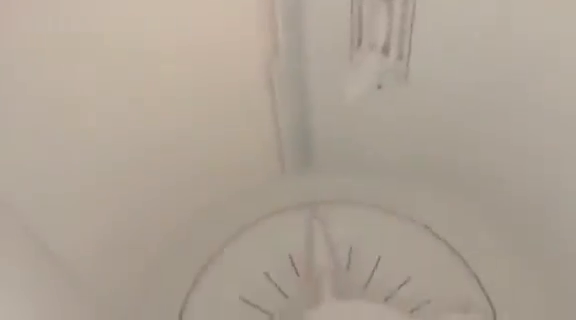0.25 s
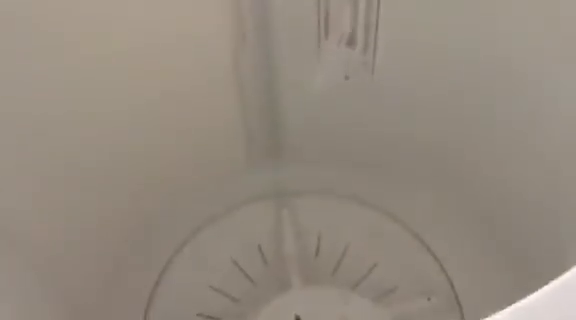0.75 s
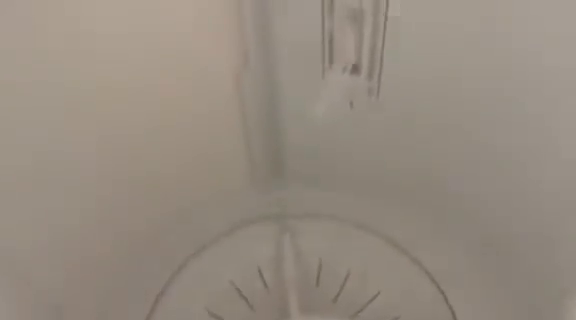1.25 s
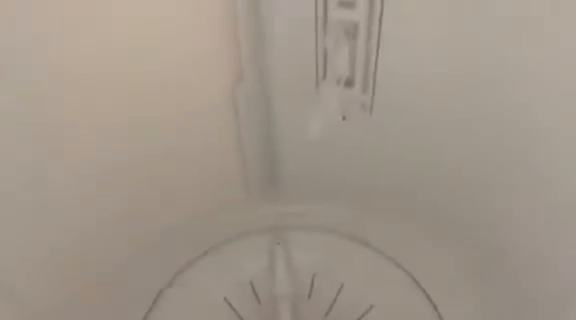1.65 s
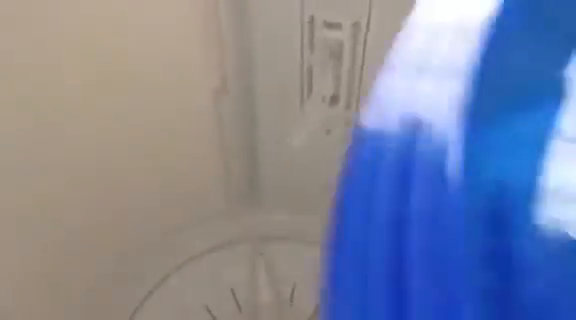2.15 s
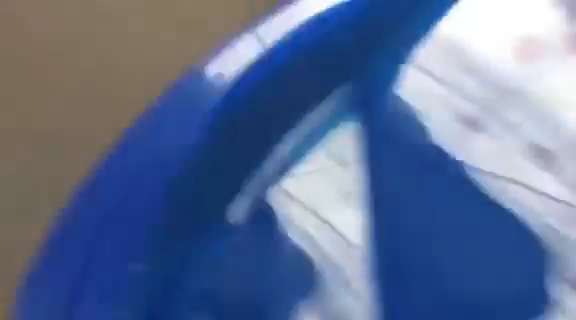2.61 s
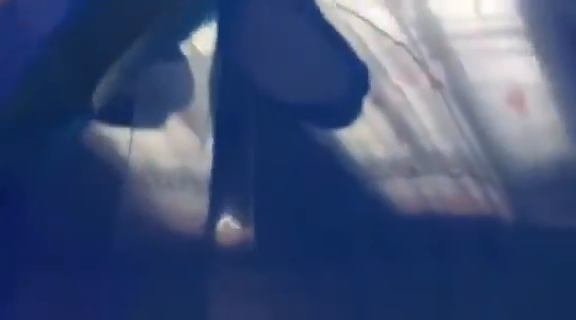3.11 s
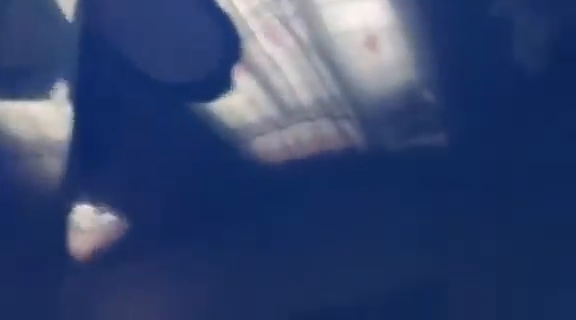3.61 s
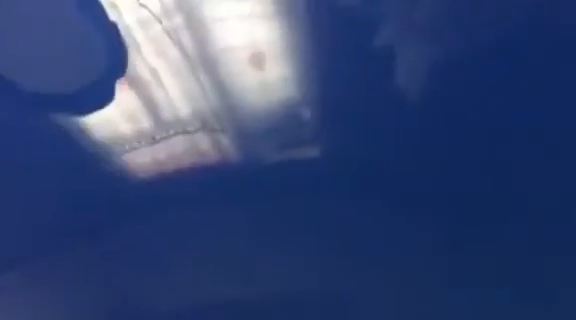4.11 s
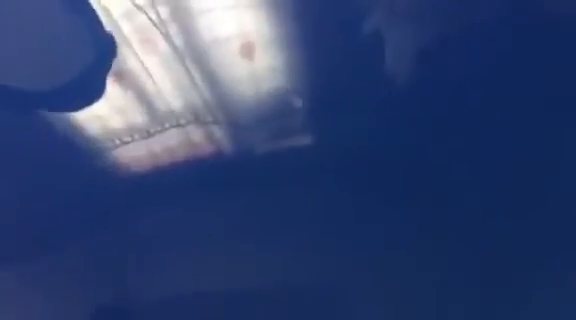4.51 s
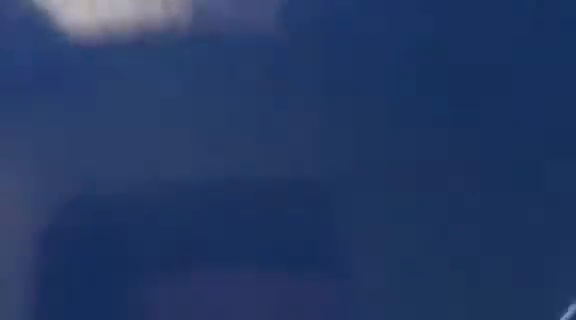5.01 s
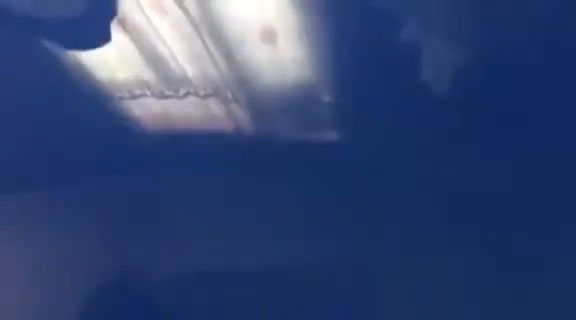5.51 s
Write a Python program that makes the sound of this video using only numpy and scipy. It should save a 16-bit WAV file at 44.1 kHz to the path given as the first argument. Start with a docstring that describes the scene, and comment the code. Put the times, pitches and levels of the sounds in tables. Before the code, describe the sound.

Over a faint indoor hum, a rooster crows far outside and a small bird repeats a thin rising whistle. Close to the microphone, a plastic lid clatters against a washing machine tub with hollow, booming knocks. It then scrapes along the rim, catching and slipping in low groans between lighter taps, until one heavy thump and a short scrape put it in place. The small room adds a brief echo.

```python
"""Hollow knocks and a low juddering scrape, close up: a plastic lid is dragged over the tub of a
washing machine and knocked into place. Each hit clacks and sets the tub booming; the sliding lid
catches, sticks and slips on the rim, and a small hard room answers. Behind it sit a faint hum,
room air and, far outside, crowing roosters and a bird's rising whistle."""
import sys
import numpy as np
from scipy import signal
from scipy.fft import rfft, irfft, next_fast_len
from scipy.io import wavfile
from scipy.ndimage import uniform_filter1d

SR = 44100
rng = np.random.default_rng(int(sys.argv[2]) if len(sys.argv) > 2 else 0)


def file_out(sig):
    """Save sig as 16-bit WAV at sys.argv[1]."""
    # one column per channel
    cols = np.atleast_2d(sig).T
    # limit, then scale
    lim = np.clip(cols, -1, 1)
    pcm = np.round(lim * 32767).astype(np.int16)
    wavfile.write(sys.argv[1], SR, pcm)


N = 253575
TIME = np.arange(N) / SR

# lid hits on the tub: start_s, clack_db, hardness_db_per_octave, thud_db, boom_db, ping_hz
KNOCKS = [(1.26, -49, 3.5, -42, -41, 1760), (2.139, -33.5, 0.8, -29, -48, 1305),
          (2.146, -37, 0.5, -38.5, -34.5, 2170), (2.353, -32, -1.2, -17.5, -18.5, 1736),
          (2.442, -35.5, -1.9, -28, -24, 2470), (2.449, -42.5, 5.8, -29.5, -28, 1220),
          (2.524, -49, -1.5, -34.5, -46, 1000), (2.562, -38.5, -1.5, -25, -56, 1070),
          (2.573, -35.5, -2.5, -24, -23.5, 1210), (2.667, -54.5, -2, -45.5, -52, 713),
          (3.062, -67, .5, -46, -69, 790), (3.126, -60, .5, -53, -66, 1080),
          (3.331, -64, 1.5, -42.5, -39.5, 604), (3.83, -60.5, 0, -37.5, -45, 630),
          (3.875, -44.5, 4.5, -35.5, -41, 1110), (3.91, -53, 0.5, -52, -41, 1170),
          (4.115, -40.5, 0.5, -31, -33.5, 1280), (4.161, -52, -.5, -47, -39, 1080),
          (4.177, -45, -2, -36, -54, 1070), (4.189, -44, -4, -28, -37, 626), (4.56, -53, -1, -30, -30, 940),
          (4.597, -47.5, -2.5, -29, -36.5, 665), (4.625, -56, 2, -62, -42.5, 844),
          (4.865, -34.5, -0.2, -27, -36.5, 1140), (5.166, -24, -5, -19.5, -13.5, 760),
          (5.167, -27, -1.5, -29.5, -30.5, 1413), (5.379, -57.5, -12, -60, -49, 610),
          (5.414, -52, -3, -47, -55, 686), (5.505, -33.5, 0.7, -28, -29.5, 1120),
          (5.537, -50.5, 3.5, -46, -48, 4500), (5.602, -53, 3.1, -50, -39.5, 660)]
# a knock's six bands (boom, wall thud, rim, clack, snap, crack): edge_hz
BAND_EDGES = [45, 90, 450, 1000, 2800, 5200, 10500]
# tub ring over plastic chatter, per band: balance_db
RING_BALANCE = [10, 6.5, 3, -2.5, -10, -30.5]
# swell of each band: attack_s
BAND_ATTACKS = [.005, 0.00034, .0003, .0002, 0.0005, 0.0013]
# top four bands of an average knock, relative to its clack: level_db
CLACK_SHAPE = [-2, -1.5, -7.5, -19.5]
# modes of the tub with its lid: pitch_hz, level_db, t60_s
TUB_MODES = [(63.3, 5.5, 0.3), (70.1, 10.5, 0.14), (111.8, -5, 0.19), (120.6, -2, 0.28),
             (147.4, -0.5, 0.18), (184, -1.5, 0.09), (219.9, -3, 0.17), (262.4, 1, 0.077),
             (312, -9.5, 0.23), (344.8, -6.5, 0.17), (401.7, -9.5, 0.2), (561, -2.5, 0.17), (708, -2, 0.16),
             (772, -3, 0.15), (856, -9, 0.39), (1019, -7, 0.35), (1120, -13.5, 0.17), (1236, -4.5, 0.51),
             (1334, -7, 0.17), (1447, -4.5, 0.14), (1550, -6.5, 0.18), (1774, -1.5, 0.096),
             (1905, -12, 0.32), (2146, -9.5, 0.35), (2337, -11.5, 0.45), (3670, -12.5, 0.039),
             (3960, -7.5, 0.021), (4520, -25, 0.083), (4800, -24.5, 0.2)]
# tone of the plastic's dense small modes: frequency_hz, gain_db
PLASTIC_EQ = [(35, -22), (60, -5.5), (155, -3.5), (284, -10), (420, -19), (593, -15.5), (720, -14),
              (875, -30.5), (1180, -23.5), (1670, -26.5), (2220, -25.5), (2810, -34), (8640, -47.5),
              (10500, -53), (13600, -95), (22000, -120)]
# pushes on the sliding lid: peak_s, rise_s, fall_s, rumble_db, scrape_db
PUSHES = [(2.71, 0.12, 0.37, -35.5, -64), (2.97, 0.6, 0.4, -39.5, -63), (3.37, 0.29, 0.36, -38.5, -68.5),
          (3.82, 0.38, 0.24, -34.5, -66.5), (4.099, 0.09, 0.047, -32.5, -56.5),
          (4.449, 0.063, 0.21, -39, -69.5), (4.68, 0.24, 0.14, -48, -62.5),
          (4.841, 0.045, 0.061, -36.5, -59.5), (5.06, .3, 0.43, -40.5, -66.5),
          (5.251, 0.1, 0.09, -22.5, -55), (5.4, 0.046, .04, -30.5, -71), (5.445, 0.058, 0.17, -27, -51),
          (5.536, 0.033, 0.054, -26, -56), (5.628, 0.091, 0.044, -36.5, -78)]
# body of the tub under the slide: frequency_hz, gain_db
RUMBLE_EQ = [(15, -63), (25, -40.5), (56, -0.5), (113, 7), (151, -1.5), (211, -4.5), (290, -10.5),
             (390, -18), (496, -33.5), (541, -36), (634, -19.5), (723, -42), (800, -26), (1040, -59),
             (1760, -120)]
# grit of the lid on the rim: frequency_hz, gain_db
SCRAPE_EQ = [(240, -35), (400, -4), (637, -9.5), (720, -15), (884, -18), (1040, -4.5), (1180, -11.5),
             (1510, -11), (2530, -19), (10500, -33), (13600, -67.5), (22000, -120)]
# stick-slip bursts: peak_s, rise_s, fall_s, slip_rate_hz, level_db
JUDDERS = [(1.319, .05, .17, 109, -40.5), (2.471, .07, 0.091, 109, -23), (2.59, 0.028, 0.1, 127, -19),
           (3.05, 0.19, 0.4, 123, -46), (3.87, .13, 0.048, 105.4, -22), (3.93, .04, 0.036, 94, -26),
           (4.088, 0.029, 0.099, 91.6, -25.5), (4.21, .03, 0.053, 105, -26), (5.05, 0.084, 0.13, 90, -36),
           (5.47, .04, 0.088, 192, -27.5)]
# syllables, one list a rooster: start_s, length_s, pitch_hz, sag_share, level_db, jitter_share
CROWS = [
    [(0, 0.24, 900, 0.052, -58.5, 0.031), (.245, .17, 1002, 0.041, -57, .04),
     (.44, .36, 987.5, .07, -55.5, 0.037), (.84, .44, 927, .1, -57, .013)],
    [(4.39, 0.29, 474, 0.0174, -63.5, .02), (4.6, 0.16, 512.6, 0.018, -61.5, 0.018),
     (4.8, 0.54, 515, 0.043, -60, 0.041)],
    [(1, .33, 1000, 0.032, -75.5, 0.016), (1.5, 0.25, 1050, .07, -74, 0.042)],
]
# voices, one list a rooster: harmonic_number, level_db
CROW_HARMONICS = [
    [(1, 0.5), (2, 13), (3, -21), (4, -25)],
    [(2, 4.5), (3, -17), (4, 9), (5, -10), (7, -5)],
    [(1, 0)],
]
# the bird's whistles: start_s, level_db
WHISTLES = [(0.199, -70.5), (0.971, -73.5), (1.951, -71), (3.34, -73), (4.078, -73), (4.938, -75.5)]
# tones of the hum: pitch_hz, level_db
HUM_TONES = [(107.7, -63.5), (145.3, -64.5), (263.8, -66.5)]
# tone of the still air: frequency_hz, gain_db
AIR_EQ = [(21, -46.5), (35, -12), (81, 0.5), (177, -6), (266, 0), (439, -19), (725, -22.5), (837, -25),
          (943, -25), (1480, -29.5), (1710, -29), (2020, -30), (5010, -37.5), (9320, -44.5), (10500, -47.5),
          (13600, -83.5), (22000, -120)]
# decay of the small hard room: frequency_hz, t60_s
ROOM_DECAY = [(100, 0.73), (500, 0.32), (2000, 0.27), (5000, 0.21), (10000, 0.17)]


def knocks(pivot_hz=1560, chatter_s=0.0035, doubling_db=18):
    """The lid strikes the tub: hard hits are brighter, heavy ones chatter longer and ping less."""
    centres_hz = np.sqrt(np.multiply(BAND_EDGES[2:-1], BAND_EDGES[3:]))
    octaves = np.log2(centres_hz / pivot_hz)
    out = np.zeros(N)
    for start_s, clack_db, hardness, thud_db, boom_db, ping_hz in KNOCKS:
        bands_db = [boom_db - clack_db, thud_db - clack_db, *(CLACK_SHAPE + hardness * octaves)]
        weight = (thud_db - clack_db) / doubling_db
        hit = knock(bands_db, chatter_s * 2 ** weight, ping_hz, ping_db=14 - 8.5 * weight)
        add(out, start_s, amp(clack_db) * hit)
    return out


def knock(bands_db, chatter_s, ping_hz, ping_db, tick_db=2.5, room_db=-3.5, ping_s=0.0015):
    """One hit layers a tick, plastic chatter, the room, the tub's ring and a ping of the struck spot."""
    tail = room_tail()
    t = np.arange(len(tail)) / SR
    chatter = rng.standard_normal(len(t)) * np.exp(-t / max(chatter_s, .001))
    tick = amp(tick_db) * (t == 0)
    plastic = equalise(chatter / np.linalg.norm(chatter) + tick + amp(room_db) * tail, PLASTIC_EQ)
    ring = tub_ring(t, boom_db=bands_db[0])
    ping_envelope = t / ping_s * np.exp(1 - t / ping_s)
    out = amp(ping_db) * ping_envelope * np.sin(2 * np.pi * ping_hz * t)
    window = round(.02 * SR)  # each band's level is set over its loudest 20 ms
    bands = zip(BAND_EDGES, BAND_EDGES[1:], bands_db, RING_BALANCE, BAND_ATTACKS)
    for low_hz, high_hz, level_db, balance_db, attack_s in bands:
        tone, noise = band(ring, low_hz, high_hz), band(plastic, low_hz, high_hz)
        layer = amp(balance_db) * tone / tone[:window].std() + noise / noise[:window].std()
        layer *= 1 - np.exp(-t / attack_s)
        loudest = np.sqrt(uniform_filter1d(layer ** 2, window, mode="constant").max())
        out += amp(level_db) * layer / loudest
    return out


def tub_ring(t, boom_db, vary_db=2.0, grip_s=0.027, rim_hz=500, detune=.012):
    """The landing lid chokes the tub's rim modes while the deep ones ring on."""
    free_db = min(-21.5 - 0.54 * boom_db, 0)  # more boom: the lid bears down and leaves less rim ring
    choke = amp(free_db) + np.exp(-t / grip_s)
    out = np.zeros(len(t))
    for k, (hz, level_db, t60_s) in enumerate(TUB_MODES):
        decay = amp(level_db + vary_db * rng.standard_normal() - 60 * t / t60_s)
        pitch_hz = hz * (1 + detune * rng.uniform(-1, 1))
        mode = (-1) ** k * decay * np.sin(2 * np.pi * pitch_hz * t)
        out += mode * (choke if hz > rim_hz else 1)
    return out


def slide(rumble_db=-1, scrape_db=3, catches_per_s=1200, room_db=2, uneven_db=3, edge_db=2):
    """Tiny catches of plastic on plastic scrape at the rim and make the tub rumble."""
    caught = rng.random(N) < catches_per_s / SR
    size_db = 3 * np.minimum(rng.exponential(1, N), 3)
    catches = caught * amp(size_db) * rng.choice([-1, 1], N)
    catches += amp(room_db) * reverb(catches)
    rumble = amp(rumble_db) * unit(equalise(catches, RUMBLE_EQ))
    grit = equalise(catches * amp(uneven_db * wander(N, 19)), SCRAPE_EQ)
    edge = band(grit, low_hz=2425, high_hz=2775, order=1)
    edge *= amp(edge_db + uneven_db * wander(N, 21))  # the lid's thin edge sings now and then
    scrape = amp(scrape_db) * unit(grit + edge)
    rumble_gain, scrape_gain = np.zeros((2, N))
    for peak_s, rise_s, fall_s, push_rumble_db, push_scrape_db in PUSHES:
        force = push(TIME - peak_s, rise_s, fall_s)
        rumble_gain = np.maximum(rumble_gain, amp(push_rumble_db) * force)
        scrape_gain = np.maximum(scrape_gain, amp(push_scrape_db) * force)
    return rumble_gain * rumble + scrape_gain * scrape


def judder(overtone_db=-15, sag_hz_per_s=70, jitter=.03):
    """Stick and slip drives the tub wall into a low groan that sags as the lid comes to rest."""
    out = np.zeros(N)
    for peak_s, rise_s, fall_s, slip_hz, level_db in JUDDERS:
        t = np.arange(-2 * rise_s, 2 * fall_s, 1 / SR)
        pitch_hz = (slip_hz - sag_hz_per_s * t) * (1 + jitter * wander(N, 72)[:len(t)])
        phase = 2 * np.pi * np.cumsum(pitch_hz) / SR
        overtones = sum(np.sin(k * phase) * 2 / k for k in range(2, 5))
        groan = unit(np.sin(phase) + amp(overtone_db) * overtones)
        add(out, peak_s + t[0], amp(level_db) * groan * push(t, rise_s, fall_s))
    return out


def push(t, rise_s, fall_s):
    """The force of a hand: 1 at t = 0, a tenth of that rise_s before and fall_s after."""
    return 10 ** -np.maximum(-t / rise_s, t / fall_s)


def roosters(ends_db=-6, rasp=0.11, rasp_hz=1100):
    """Raspy crows: each syllable droops in pitch and level at both ends, where the effort is low."""
    out = np.zeros(N)
    for syllables, harmonics in zip(CROWS, CROW_HARMONICS):
        for start_s, length_s, pitch_hz, sag, level_db, jitter in syllables:
            slack = 1 - effort(np.arange(0, length_s, 1 / SR))
            note = bird_note(pitch_hz * (1 - sag * slack), harmonics, jitter, jitter_hz=166)
            add(out, start_s, amp(level_db + ends_db * slack) * note)
    return out * (1 + rasp * wander(N, rasp_hz))  # uneven cycles make the rasp


def whistles(trim_db=-1, length_s=0.21, start_hz=4100, rise_hz_per_s=11800, ends_db=-6, flutter_db=3):
    """A bird repeats one fluttering upward glide, its pitch blurred by fast jitter."""
    t = np.arange(0, length_s, 1 / SR)
    out = np.zeros(N)
    for start_s, level_db in WHISTLES:
        shape_db = ends_db * (1 - effort(t)) + flutter_db * wander(SR, 25)[:len(t)]
        note = bird_note(start_hz + rise_hz_per_s * t, harmonics=[(1, 0)], jitter=.06, jitter_hz=900)
        add(out, start_s, amp(trim_db + level_db + shape_db) * note)
    return out


def bird_note(pitch_hz, harmonics, jitter, jitter_hz):
    """Harmonics on a trembling pitch, with a short fade at each end."""
    tremble = 1 + jitter * wander(SR, jitter_hz)[:len(pitch_hz)]
    phase = 2 * np.pi * np.cumsum(pitch_hz * tremble) / SR
    voice = sum(amp(level_db) * np.sin(k * phase) for k, level_db in harmonics)
    return unit(voice) * signal.windows.tukey(len(pitch_hz), .04)


def effort(t, crest_share=.32):
    """A bird's effort over one note: from 0 up to 1 at the crest and back."""
    return np.sin(np.pi * np.interp(t, [0, crest_share * t[-1], t[-1]], [0, .5, 1]))


def far_birds(direct_db=-3, room_db=-4):
    """The calls from outside, blurred on their way into the room."""
    calls = roosters() + whistles()
    return amp(direct_db) * calls + amp(room_db) * reverb(calls)


def hum(trim_db=-3, waver=0.1):
    """Faint low tones that waver in level and phase."""
    out = np.zeros(N)
    for pitch_hz, level_db in HUM_TONES:
        gain = amp(trim_db + level_db) * (1 + waver * wander(N, 7.8))
        out += gain * np.sqrt(2) * np.sin(2 * np.pi * pitch_hz * TIME + wander(N, 10))
    return out


def room_air(level_db=-58.5):
    """A steady bed of dark noise."""
    return amp(level_db) * unit(equalise(rng.standard_normal(N), AIR_EQ))


def room_tail(build_s=0.0064):
    """Diffuse echoes of energy 1, each band dying at its own speed."""
    hz, t, spectrum = signal.stft(rng.standard_normal(SR * 3 // 4), SR, nperseg=256)
    decay = amp(-60 * t / curve(ROOM_DECAY, hz)[:, None])
    tail = signal.istft(spectrum * decay, SR, nperseg=256)[1]
    tail *= 1 - np.exp(-np.arange(len(tail)) / SR / build_s)
    return tail / np.linalg.norm(tail)


def reverb(x):
    """The room's answer alone, fully wet."""
    return signal.fftconvolve(x, room_tail())[:N]


def amp(db):
    """Decibels to gain."""
    return 10 ** (np.asarray(db) / 20)


def unit(x):
    """Scales to rms 1."""
    return x / np.sqrt(np.mean(x ** 2) + 1e-20)


def curve(points, hz):
    """Reads a table on a log-frequency axis."""
    points_hz, values = np.transpose(points)
    return np.interp(np.log(hz + 1), np.log(points_hz + 1), values)


def add(mix, start_s, sound):
    """Drops a sound into the mix at start_s."""
    part = mix[max(round(start_s * SR), 0):][:len(sound)]
    part += sound[:len(part)]


def equalise(x, eq):
    """Minimum-phase EQ, so nothing rings ahead of a hit."""
    size = 2 * next_fast_len(len(x))
    log_gain = np.log(amp(curve(eq, abs(np.fft.fftfreq(size, 1 / SR)))))
    response = np.exp(np.conj(signal.hilbert(log_gain)))
    return irfft(rfft(x, size) * response[:size // 2 + 1], size)[:len(x)]


def band(x, low_hz, high_hz, order=3):
    """Causal band-pass."""
    return signal.sosfilt(signal.butter(order, [low_hz, high_hz], "band", fs=SR, output="sos"), x)


def wander(size, rate_hz):
    """Random drift of rms 1, rolling off above rate_hz."""
    roll_off = np.exp(-(np.fft.rfftfreq(size, 1 / SR) / rate_hz) ** 2)
    return unit(irfft(rfft(rng.standard_normal(size)) * roll_off, size))


def scene():
    """The mono mix: lid and tub up front, birds and room tone behind."""
    return (knocks() + slide() + judder() + far_birds() + hum() + room_air())[None]


def record(dry):
    """A steep high cut takes off the top of the treble."""
    cutoff_hz = 10750
    low_pass = signal.firwin(255, cutoff_hz, window=("kaiser", 8), fs=SR)
    return signal.oaconvolve(dry, low_pass[None], "same")


dry = scene()
out = record(dry)
file_out(out)
```